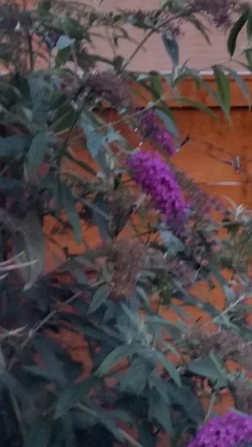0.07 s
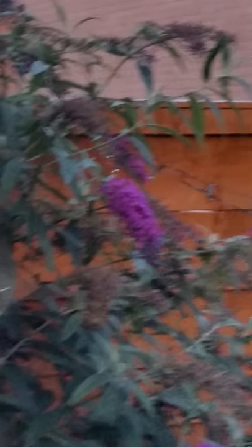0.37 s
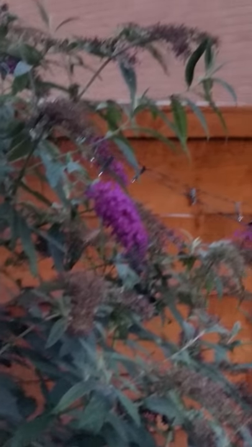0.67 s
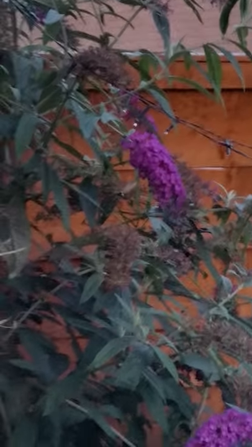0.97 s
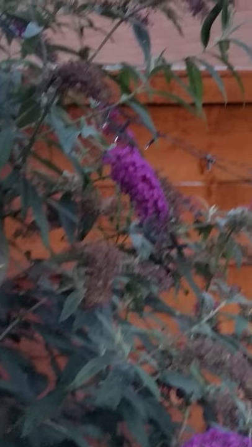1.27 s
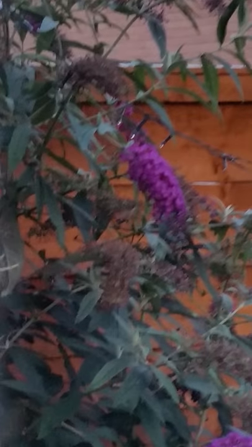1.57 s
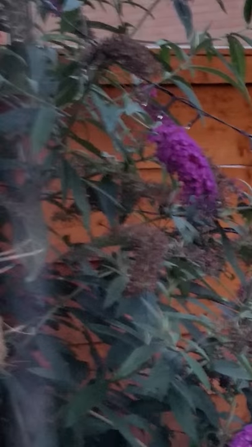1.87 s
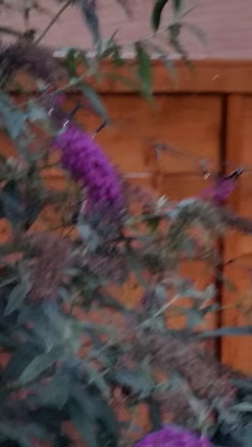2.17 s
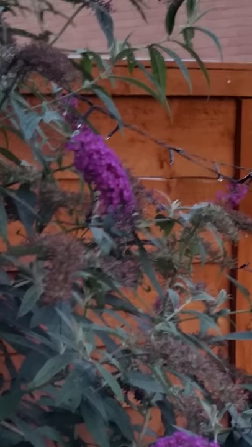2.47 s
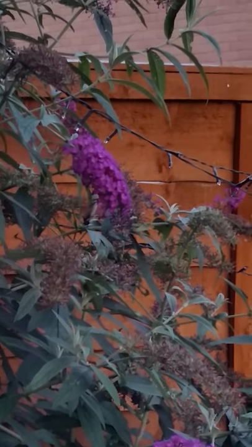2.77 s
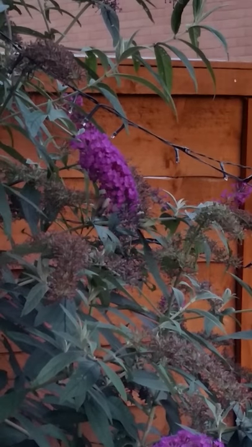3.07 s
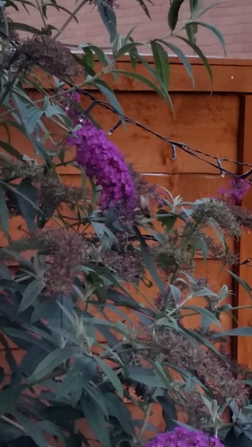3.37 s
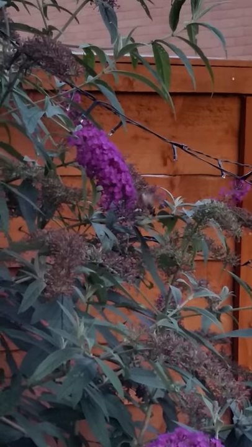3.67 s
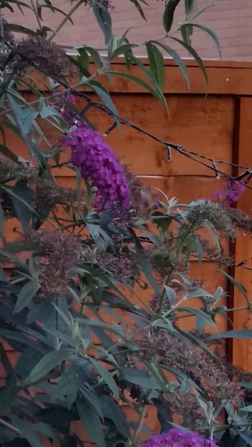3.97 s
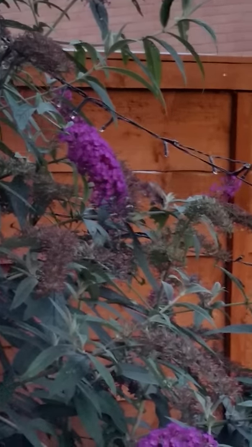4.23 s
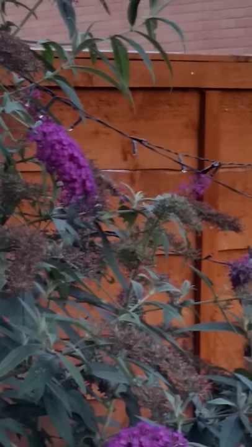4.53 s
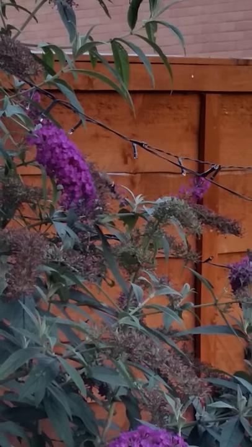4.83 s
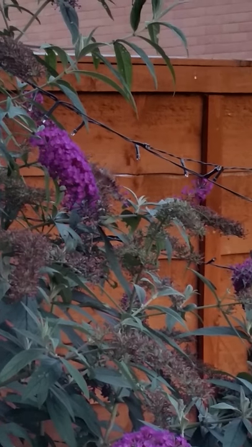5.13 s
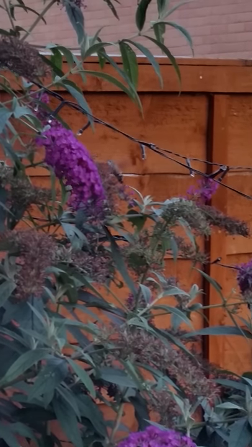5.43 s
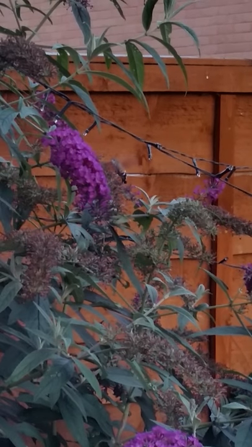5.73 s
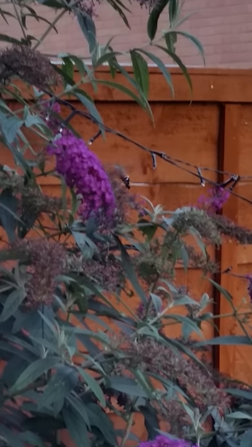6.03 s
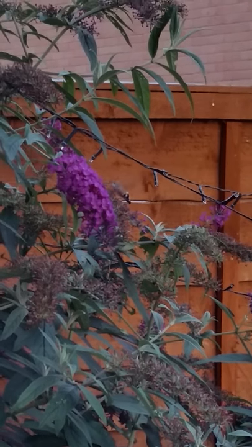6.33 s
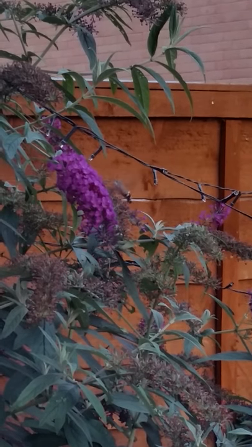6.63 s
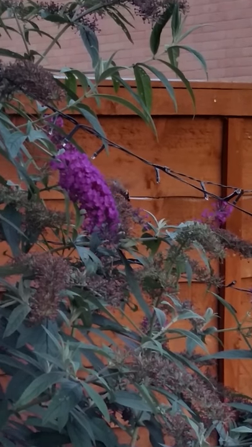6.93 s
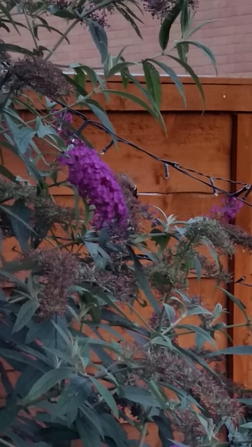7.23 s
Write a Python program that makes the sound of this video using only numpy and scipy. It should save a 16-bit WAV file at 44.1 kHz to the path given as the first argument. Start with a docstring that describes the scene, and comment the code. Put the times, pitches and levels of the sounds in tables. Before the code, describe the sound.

In a quiet back garden, a finger drags over a hand-held phone close to the right microphone, making juddering runs of dull thumps and a low rumble. After about two seconds the thumps come singly, mixed with soft knocks and taps. The finger then rests, leaving a few last knocks. Distant traffic, faint hiss and a machine's steady low hum continue throughout.

```python
"""A hand-held phone in a quiet back garden. From the start a finger creeps over the case beside the right
microphone in juddering runs of dull stick-slip thumps, the skin rumbling as it drags. Behind it distant
traffic and a faint hiss swell in slightly, and a mains-driven machine hums beyond the fence.
After two seconds the slips come singly, and soft knocks and taps of the grip reach both microphones.
By 4.5 s the finger rests; a last few knocks and taps fall over the hum and the traffic."""
import sys
import numpy as np
from scipy import signal
from scipy.fft import rfft, irfft
from scipy.io import wavfile

SR = 44100
rng = np.random.default_rng(int(sys.argv[2]) if len(sys.argv) > 2 else 0)


def to_wav(sig):
    """Store sig (one row per channel, or 1-D mono) as 16-bit WAV at the path in sys.argv[1].

    Samples outside -1..1 are clipped; the rate is SR.
    """
    pcm = np.clip(np.atleast_2d(sig), -1, 1) * 32767
    pcm = np.round(pcm).astype(np.int16)
    wavfile.write(sys.argv[1], SR, pcm.T)  # frames by channels


N = 326340
T = np.arange(N) / SR
HZ = np.maximum(np.arange(N // 2 + 1) * SR / N, 1)
FINGER_TURNS_S = 1.05

# the background swells in: time_s, traffic_db, hiss_db
SWELL = [(0, -1.5, -3), (.45, -3, -4), (.8, -1, 1), (2, 0, 1.4), (7.4, 0, 1.4)]


def from_db(db):
    """Decibels to gain."""
    return 10 ** (np.asarray(db) / 20)


def unit_rms(x):
    """Scale to unit rms."""
    return x / np.sqrt(np.mean(x ** 2) + 1e-20)


def in_time(rows):
    """Each column of an automation curve at every sample."""
    times, *columns = np.transpose(rows)
    return [np.interp(T, times, column) for column in columns]


def over_hz(points):
    """A curve joined on a log-frequency axis."""
    hz, value = np.transpose(points)
    return np.interp(np.log(HZ), np.log(hz), value)


def panned(pan_db):
    """Gains of the two channels; pan_db is left over right."""
    return from_db(np.array([[1], [-1]]) * pan_db / 2)


def noise(gain):
    """White noise shaped by a gain per frequency."""
    return irfft(rfft(rng.standard_normal(N)) * gain, N)


def drift(rate_hz):
    """A slow random wander of unit rms."""
    return unit_rms(noise(1 / (1 + (HZ / rate_hz) ** 2)))


def filtered(x, hz, kind):
    """A gentle low-, high- or band-pass."""
    return signal.sosfilt(signal.butter(2, hz, kind, fs=SR, output="sos"), x + 1e-18)


def resonance(force, hz, width_hz):
    """One damped mode driven by a force."""
    r = np.exp(-np.pi * width_hz / SR)
    gain = (1 - r * r) / 2
    feedback = [1, -2 * r * np.cos(2 * np.pi * hz / SR), r * r]
    return signal.lfilter([gain, 0, -gain], feedback, force + 1e-18)


def finger(case_db=8, far_side_db=-19):
    """Stick-slip thumps the case, in runs and singly, close to the right microphone."""
    # the finger lets go just once: time_s, level_db
    single_slips = [(0.2902, -17), (0.3227, -9.5), (0.5878, -14), (2.3544, -15.5), (2.3821, -12),
                    (2.4243, -9), (2.4659, -9.5), (2.6162, -8), (2.722, -9.5), (2.7643, -9.5),
                    (2.8594, -10), (3.0109, -10.5), (3.281, -12), (3.3181, -6.5), (3.4984, -8),
                    (3.5892, -10), (3.6267, -17), (3.9178, -5.5), (4.302, -16.5), (4.4159, -17.5)]
    runs = slip_force(judders())
    near = from_db(case_db) * case(runs + slip_force(single_slips)) + finger_pad(runs)
    return np.array([from_db(far_side_db) * near, near])


def judders(jitter=0.045, spread_db=1.5, catch_chance=0.4, catch_s=0.008, catch_loss_db=8):
    """The skin slips almost evenly, at times catching again just after; gives (time_s, level_db)."""
    # the finger judders in short runs: start_s, slip_count, period_s, level_db
    runs = [(0.027, 7, 0.022, -19.5), (0.2014, 3, 0.027, -10), (0.3769, 3, .031, -9),
            (0.4740, 3, .0295, -11), (0.6359, 2, .024, -11), (1.1647, 7, 0.026, -14.5),
            (1.3736, 2, 0.026, -11.5), (1.4409, 3, 0.029, -11), (1.6678, 3, .030, -12.5),
            (1.756, 3, .0195, -8), (1.8766, 3, 0.026, -10.5), (1.9673, 2, 0.027, -16)]
    slips = []
    for start, count, period, db in runs:
        for k in range(round(count)):
            late, strength = rng.standard_normal(2)
            time_s = start + period * (k + jitter * late)
            level_db = db + spread_db * strength
            slips.append((time_s, level_db))
            if rng.random() < catch_chance:
                slips.append((time_s + catch_s, level_db - catch_loss_db))
    return slips


def slip_force(slips, reference_ms=0.71, reference_db=-10, halving_db=22.5):
    """One push per slip, shorter the harder it is; the force flips when the finger turns back."""
    force = 0
    for time_s, db in slips:
        width_ms = reference_ms * 2 ** ((reference_db - db) / halving_db)
        force += np.sign(time_s - FINGER_TURNS_S) * from_db(db) * push(time_s, width_ms)
    return force


def push(time_s, width_ms, stick=0.072, lead_widths=3.0):
    """A smooth force pulse, led by a slight pull the other way while the skin still sticks."""
    widths = (T - time_s) * 1000 / width_ms
    near = np.abs(widths) < 10
    pull = stick * np.exp(-(widths[near] + lead_widths) ** 2 / 2)
    force = np.zeros(N)
    force[near] = np.exp(-widths[near] ** 2 / 2) - pull
    return force


def case(force, low_cut_hz=102):
    """The hand damps the case to a single swing; the microphone drops the deepest bass."""
    return filtered(resonance(force, hz=67, width_hz=158), low_cut_hz, "high")


def finger_pad(force, low_cut_hz=62):
    """The soft pad of the juddering finger wobbles after each slip, lower on the way back."""
    outward = from_db(-2) * resonance(force * (T < FINGER_TURNS_S), hz=108, width_hz=38)
    back = from_db(1) * resonance(force * (T >= FINGER_TURNS_S), hz=80, width_hz=38)
    return filtered(outward + back, low_cut_hz, "high")


def skin(band_hz=(72, 190), resting_db=-53.5, far_side_db=-15, attack_db_per_s=149.5, release_db_per_s=46):
    """Dragging skin rumbles over the resting grip; each microphone feels its own part of the case."""
    # the finger drags in strokes: start_s, end_s, level_db
    strokes = [(0, 0.186, -27), (.2, 0.813, -32.5), (1.202, 1.465, -30.5), (1.68, 1.944, -31),
               (2.15, 2.38, -39)]
    level_db = resting_db
    for start, end, db in strokes:
        fade_in_db = attack_db_per_s * np.maximum(start - T, 0)
        fade_out_db = release_db_per_s * np.maximum(T - end, 0)
        level_db = np.maximum(level_db, db - fade_in_db - fade_out_db)
    dull = 1 / (1 + (HZ / 500) ** 4)
    left, right = (unit_rms(filtered(noise(dull), band_hz, "band")) for _ in range(2))
    return from_db(level_db) * np.array([from_db(far_side_db) * left, right])


def knocks(gain_db=10):
    """The grip shifts and knocks through the whole case to both microphones."""
    # pushes of the grip: time_s, level_db, width_ms, pan_db
    shifts = [(2.2085, -19.5, .58, 4.5), (3.443, -29.5, 0.7, -9.5), (3.748, -26, 0.46, 14),
              (4.04, -26.5, 0.46, 12.5), (4.0493, -25.5, 0.69, -2), (6.012, -30.5, 1.3, 7),
              (6.5013, -29.5, 0.39, 15.5), (6.725, -20.5, 2.2, 3), (6.7442, -20, 0.47, -14)]
    force = sum(from_db(db) * panned(pan_db) * push(s, ms) for s, db, ms, pan_db in shifts)
    return from_db(gain_db) * case(force)


def taps(attack_s=0.00058):
    """Each light tap rings one damped part of the case for ten to twenty cycles."""
    # taps on the case: start_s, level_db, pitch_hz, t60_s, pan_db
    hits = [(2.2050, -32, 675, 0.016, 1), (3.4410, -36.5, 770, 0.025, 5), (3.7430, -33.5, 800, 0.013, 9),
            (3.8980, -34.5, 775, .025, 6), (4.0380, -36, 700, .02, 0), (6.785, -19.5, 272, 0.049, -6.5),
            (7.1010, -31.5, 790, 0.023, -3)]
    rings = np.zeros((2, N))
    for start, db, hz, t60, pan_db in hits:
        age = np.clip(T - start, 0, 3 * t60)
        envelope = from_db(db - 60 * age / t60) * (1 - np.exp(-age / attack_s))
        rings += panned(pan_db) * envelope * np.sin(2 * np.pi * hz * age)
    return rings


def ticks(decay_s=0.0012, top_hz=11000):
    """The case gives tiny dry ticks, each a millisecond of bright crackle."""
    # ticks of the case: start_s, level_db
    bursts = [(.2510, -61), (.2600, -63), (.8072, -63), (3.3170, -57), (3.9190, -60)]
    envelope = sum(from_db(db) * (T >= s) * np.exp(-np.abs(T - s) / decay_s) for s, db in bursts)
    return filtered(envelope * rng.standard_normal((2, N)), top_hz, "low")


def machine_hum(mains_hz=49.965, waver_db=0.9, wander_rad=0.045, pan_db=-1.5):
    """Mains harmonics, each wavering a little in level and phase on its way through the moving air."""
    # partials of the hum: mains_multiple, level_db
    harmonics = [(2, -53.5), (4, -39.5), (6, -53.5), (7, -58), (8, -65)]
    hum = 0
    for multiple, db in harmonics:
        phase = multiple * (2 * np.pi * mains_hz * T + wander_rad * drift(0.9))
        hum += from_db(db + waver_db * drift(2.5)) * np.sqrt(2) * np.sin(phase)
    return panned(pan_db) * hum


def traffic(level_db=-43, restless_db=0.4):
    """A far wash of traffic: alike at both microphones in the bass, diffuse in the treble."""
    # broad tone of the wash: frequency_hz, relative_db
    spectrum = [(25, -13), (60, 0.5), (110, 1), (170, 1), (240, -1.5), (350, -5), (480, -9), (900, -10.5),
                (1500, -11), (2000, -16.5), (2700, -23.5), (4200, -30.5), (5000, -39.5), (6000, -56)]
    # narrow colours in it: centre_hz, width_hz, boost_db
    colours = [(300, 20, 2.5), (350, 30, 2), (590, 45, 3), (680, 40, 4), (785, 40, 3.5), (905, 60, 6),
               (1320, 60, 2.5), (1690, 60, 3), (1942, 50, 5.5)]
    # where each band leans: frequency_hz, pan_db
    balance = [(60, -7), (110, -2), (380, 3.5), (700, 0.5), (1300, -3), (2400, 2)]
    # how alike left and right are: frequency_hz, correlation
    likeness = [(60, 1), (130, 0.84), (290, 0.86), (640, 0.57), (1400, -0.081), (3000, -0.14)]
    colour_db = sum(db / (1 + (2 * (HZ - hz) / width) ** 2) for hz, width, db in colours)
    gain = from_db(over_hz(spectrum) + colour_db) * panned(over_hz(balance))
    gain /= 1 + (HZ / 7000) ** 8   # the air takes the top away
    alike = over_hz(likeness)
    mid = noise(gain * np.sqrt(1 + alike))
    side = noise(gain * np.sqrt(1 - alike)) * [[1], [-1]]
    swell_db, _ = in_time(SWELL)
    return from_db(level_db + swell_db + restless_db * drift(7.2)) * unit_rms(mid + side)


def hiss(level_db=-60.5):
    """Each microphone has its own hiss, coloured by its port."""
    # tone of each port: frequency_hz, relative_db
    left_port = [(2500, -13.5), (3300, -5.5), (3900, 2.5), (4400, -2.5), (4900, -11.5), (5600, -33),
                 (7000, -37.5), (9600, -31.5), (10500, -21.5), (12000, -28), (13500, -21.5), (15600, -18.5)]
    right_port = [(2500, -19.5), (4000, -14.5), (4900, -18.5), (5600, -29), (7000, -34), (9600, -37),
                  (10500, -31.5), (12000, -29.5), (13500, -25.5), (15600, -20)]
    low_cut = 1 / (1 + (2000 / HZ) ** 4)
    both = np.array([noise(from_db(over_hz(port)) * low_cut) for port in (left_port, right_port)])
    _, swell_db = in_time(SWELL)
    return from_db(level_db + swell_db) * unit_rms(both)


def scene():
    """The garden behind, the hand in front."""
    return traffic() + machine_hum() + hiss() + finger() + skin() + knocks() + taps() + ticks()


def record(dry):
    """A steep high cut takes off the very top."""
    cutoff_hz = 15800
    return irfft(rfft(dry) / np.sqrt(1 + (HZ / cutoff_hz) ** 300), N)


dry = scene()
out = record(dry)
to_wav(out)
```